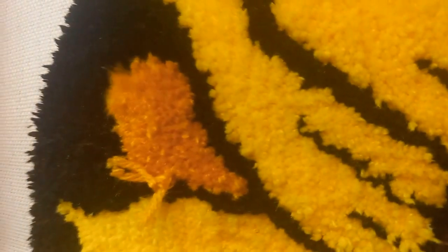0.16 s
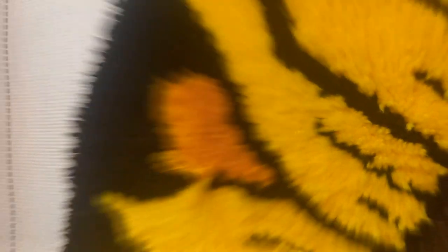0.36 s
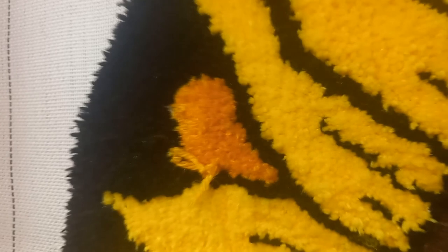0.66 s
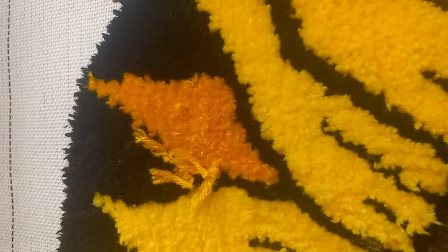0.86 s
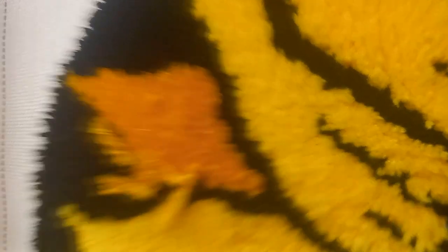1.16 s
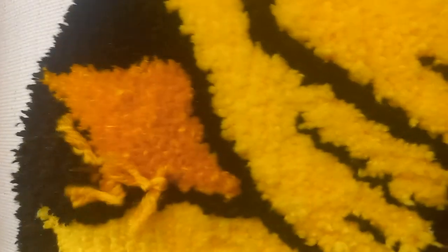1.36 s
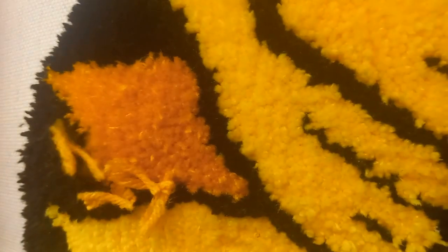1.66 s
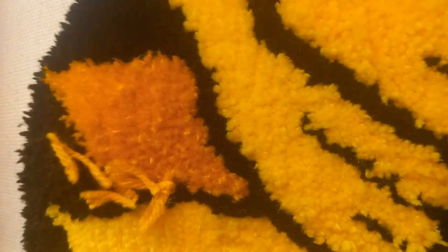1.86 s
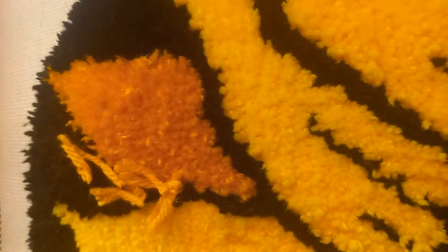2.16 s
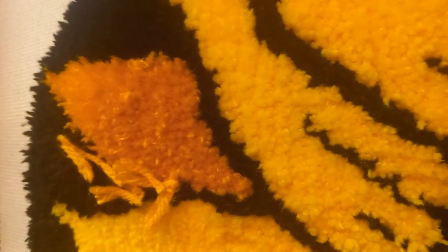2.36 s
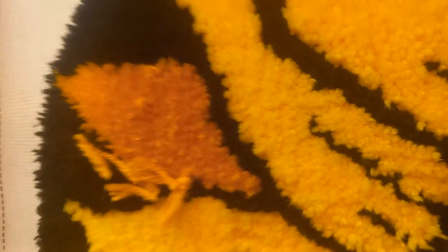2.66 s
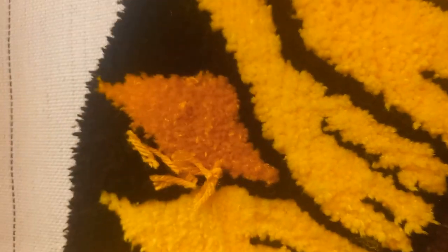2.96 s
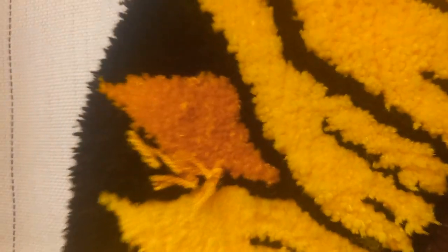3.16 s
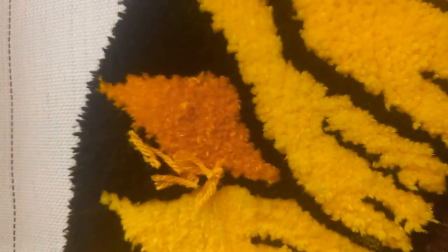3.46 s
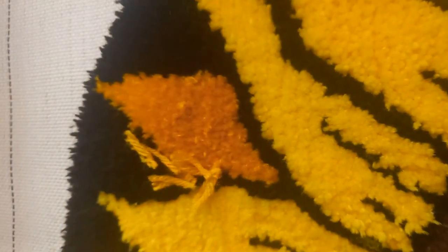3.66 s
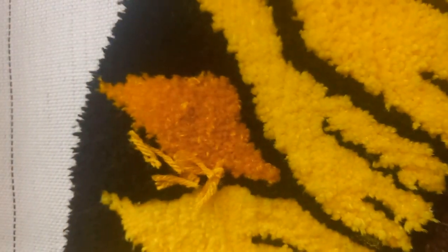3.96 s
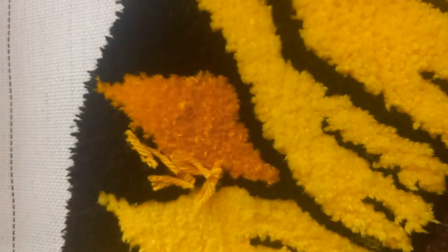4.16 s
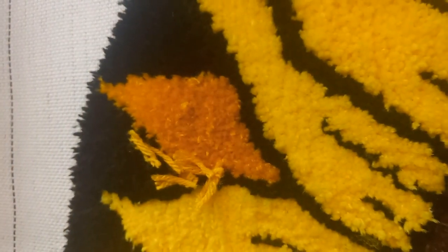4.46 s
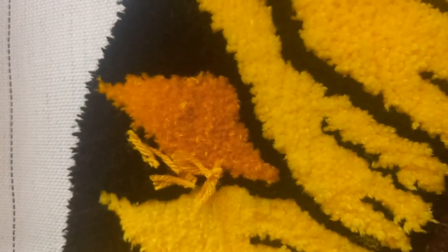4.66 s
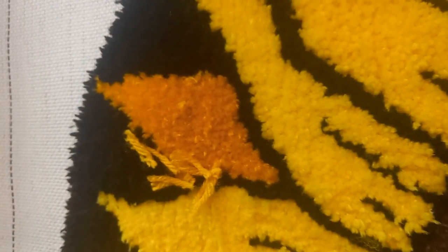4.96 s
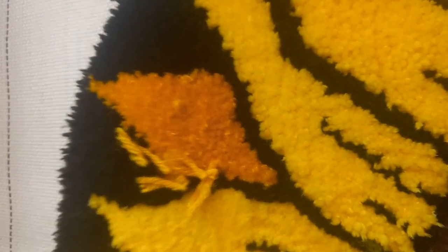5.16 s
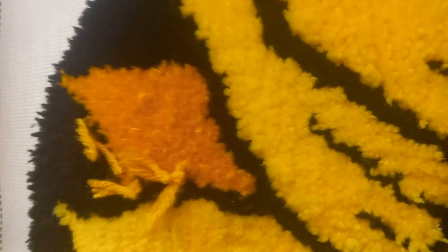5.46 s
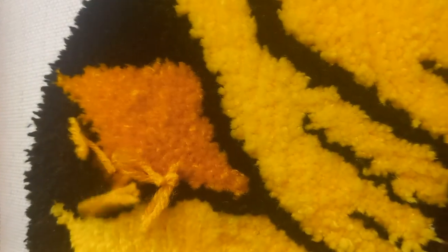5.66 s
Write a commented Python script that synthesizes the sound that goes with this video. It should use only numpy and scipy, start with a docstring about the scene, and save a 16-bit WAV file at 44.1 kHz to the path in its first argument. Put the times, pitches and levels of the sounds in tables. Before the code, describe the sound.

Close by in a small, slightly echoing room, an electric tufting gun punches yarn into stretched cloth. It is already running and stops almost at once. After a pause and a few clicks it runs for about a second and a half, with a fast rattle, crisp snips, low thumps and a wavering gear whine. A longer pause with faint ticks and low background noise follows, then the gun starts again near the end.

```python
"""A small live room: close by, an electric tufting gun punches yarn into stretched cloth in three bursts.
Each stroke snips the yarn, rattles the frame and thumps the cloth; the gears whine, sagging twice a
stroke under load. Between bursts the gun is shifted on the cloth with faint ticks. Underneath lies
low background noise whose level steps or ramps up, holds, then fades down."""
import sys
import numpy as np
from scipy import signal
from scipy.fft import rfft, irfft, next_fast_len
from scipy.io import wavfile
from scipy.ndimage import map_coordinates

SR = 44100
rng = np.random.default_rng(int(sys.argv[2]) if len(sys.argv) > 2 else 0)


def wav_record(signal):
    """Record a signal, one row per channel, as 16-bit PCM in the file named by sys.argv[1]."""
    frames = np.transpose(np.atleast_2d(signal))
    bounded = np.clip(frames, -1, 1)
    # unit amplitude maps onto the largest positive 16-bit level
    quanta = np.round(bounded * 32767).astype(np.int16)
    wavfile.write(sys.argv[1], SR, quanta)


N = 255853


def amp(db):
    """Decibels to gain."""
    return 10 ** (np.asarray(db) / 20)


def unit(x):
    """x at rms 1."""
    return x / np.sqrt(np.mean(x ** 2) + 1e-20)


def along(points, hz):
    """Read a curve of (Hz, value) points on a log frequency axis."""
    f, v = np.transpose(points)
    return np.interp(np.log(hz + 1), np.log(f + 1), v)


def bell(t, centre, width):
    """A bell-shaped envelope that peaks at 1."""
    return np.exp(-((t - centre) / width) ** 2)


def wobble(rate):
    """A smooth random curve, rate knots a second."""
    count = int(N * rate / SR) + 4
    at = np.linspace(0, count - 1, count * 6)
    return np.interp(np.arange(N) * rate / SR, at, map_coordinates(rng.standard_normal(count), [at]))


def filtered(x, response):
    """EQ x with a gain given as a function of frequency."""
    n = x.shape[-1]
    m = next_fast_len(n + 8192)
    return irfft(rfft(x, m) * response(np.fft.rfftfreq(m, 1 / SR)), m)[..., :n]


def resonate(x, modes):
    """x through parallel resonances (centre [Hz], width [Hz], gain [dB])."""
    return filtered(x, lambda f: sum(amp(db) * 1j * f * w / (c * c - f * f + 1j * f * w)
                                     for c, w, db in modes))


def spread(pair, spectrum, alike):
    """Two unrelated signals coloured and blended into stereo of rms 1."""
    angle = lambda hz: np.arccos(np.clip(along(alike, hz), -1, 1)) / 2
    mid, side = filtered(pair, lambda f: amp(along(spectrum, f)) * [np.cos(angle(f)), np.sin(angle(f))])
    return unit(np.array([mid + side, mid - side]))


def add(track, s, sound):
    """Mix a sound into the track at time s."""
    i = round(s * SR)
    a, b = max(i, 0), min(i + sound.shape[-1], N)
    if b > a:
        track[..., a:b] += sound[..., a - i:b - i]


def thud(hz, swell):
    """A soft, heavily damped blow that peaks after swell seconds."""
    t = np.arange(SR // 6) / SR
    return (t / swell * np.exp(1 - t / swell)) ** 2 * np.sin(2 * np.pi * hz * t)


# colour of the low rush (frequency [Hz], relative level [dB])
RUSH_EQ = [(18, -55), (30, -31), (50, -18), (106, -3.5), (190, -9), (283, -4.5), (392, -10), (557, -13.5),
           (704, -23.5), (1050, -27), (1520, -31.5), (5010, -42.5), (8000, -53), (10400, -81),
           (17600, -120)]
# colour of the thin hiss (frequency [Hz], relative level [dB])
HISS_EQ = [(3000, -38.5), (9000, -15), (11000, -3.5), (14000, 1.5), (16000, -1.5)]
# stereo image of the noise bed (frequency [Hz], left-right correlation [-1..1])
BED_IMAGE = [(60, 0.51), (180, 0.95), (550, 0.62), (1650, -0.14), (4970, -0.0), (15000, 0.02)]
# the bed's level steps or ramps up, holds, fades down (start [s], rise [s], end of hold [s], boost [dB])
BED_BOOSTS = [(.848, .01, 1.55, 12), (3.85, 0.52, 5.8, 12)]

def noise_bed(t, rush_floor_db=-56, hiss_floor_db=-78, uneven_db=.8, fade_s=1.7):
    """Background noise: a low, slightly uneven rush and a thin hiss on one shared level envelope."""
    boost_db = sum(db * np.clip((t - start) / rise, 0, 1) * np.clip(1 - (t - end) / fade_s, 0, 1)
                   for start, rise, end, db in BED_BOOSTS)
    rush_gain = amp(rush_floor_db + uneven_db * wobble(16))
    rush = rush_gain * spread(rng.standard_normal((2, N)), RUSH_EQ, BED_IMAGE)
    hiss = amp(hiss_floor_db) * spread(rng.standard_normal((2, N)), HISS_EQ, BED_IMAGE)
    return amp(boost_db) * (rush + hiss)


# reverb decay (frequency [Hz], t60 [s])
ROOM_DECAY = [(100, 0.18), (500, 0.58), (1400, 0.5), (2200, 0.55), (3700, 0.51), (10000, 0.47),
              (16000, .35)]
# EQ on the reverb send (frequency [Hz], gain [dB])
ROOM_SEND = [(80, -8), (300, -12), (700, -5.5), (1100, -9), (1600, -0.5), (2200, -4), (4000, -0.5),
             (14000, -1.5)]

def room(x):
    """The walls answer with a short tail; each frequency dies at its own speed."""
    hz, t, noise = signal.stft(rng.standard_normal((2, int(.7 * SR))), SR, nperseg=256)
    decay = amp(-60 * t / along(ROOM_DECAY, hz)[:, None])
    tail = signal.istft(noise * decay / np.linalg.norm(decay, axis=1, keepdims=True), SR, nperseg=256)[1]
    tail = np.pad(tail / np.linalg.norm(tail[0]), ((0, 0), (SR // 200, 0)))  # 5 ms pre-delay
    send = filtered(x.mean(0), lambda hz: amp(along(ROOM_SEND, hz)))
    return signal.fftconvolve(send[None], tail, axes=1)[:, :N]


def scuff(t, at_s=1.35, width_s=.03, db=-60, hz=5000.5):
    """The gun's steel foot slides over the cloth: a soft, brief brush."""
    brush = unit(resonate(rng.standard_normal((2, N)), [(hz, hz, 0)]))
    return amp(db) * bell(t, at_s, width_s) * brush


# trigger, slack gears and handling (time [s], level before trim [dB], centre [Hz])
CLICKS = [(1.175, -45.5, 4980), (1.339, -22.5, 3540), (1.362, -17, 2100), (1.374, -20, 2000),
          (1.4455, -15, 2800), (2.748, -26, 2384), (4.459, -51, 6000), (4.846, -57, 5970),
          (4.916, -56.5, 7040), (5.08, -54.5, 5460), (5.253, -47, 6500), (5.542, -30.5, 2300),
          (5.561, -23, 3410)]
# the foot bumps the cloth (time [s], pitch [Hz], level [dB], attack [s])
BUMPS = [(.258, 306, -31, 0.0056), (0.291, 91, -32.5, 0.014), (1.149, 153, -43, 0.014),
         (1.176, 77.6, -34, 0.016), (1.343, 170, -25.5, 0.0043), (1.358, 325, -28, .008),
         (1.444, 330, -18, .003), (2.084, 290, -23, 0.0036), (2.135, 300, -23.5, 0.0029),
         (2.274, 92, -25.5, 0.01), (2.379, 115.3, -15, 0.0061), (2.379, 325, -10.5, 0.0015),
         (2.755, 89, -26.5, 0.0089), (5.076, 124, -35, 0.0087), (5.566, 220, -25.5, 0.0027),
         (5.626, 322, -26, 0.007)]
# steel pings as the motor jerks into motion (time [s], pitch [Hz], level [dB], t60 [s])
PINGS = [(5.543, 2430, -46, .08), (5.566, 4572, -28, .2), (5.566, 4568, -37, .9)]

def handling(click_t60=.026, click_trim_db=-3.5):
    """Spot effects: clicks of trigger and slack gears, bumps on the cloth and the ping of steel."""
    out, t = np.zeros((2, N)), np.arange(SR // 2) / SR
    for s, db, hz in CLICKS:
        crack = resonate(rng.standard_normal((2, len(t))), [(hz, .5 * hz, 0)])
        add(out, s, amp(db + click_trim_db - 60 * t / click_t60) * unit(crack))
    for s, hz, db, swell in BUMPS:
        add(out, s, amp(db) * thud(hz, swell))
    for s, hz, db, t60 in PINGS:
        add(out, s, amp(db - 60 * t / t60) * np.sin(2 * np.pi * hz * t))
    return out


# the motor is switched on and off (start [s], end [s], trim [dB])
BURSTS = [(-.4, .325, .5), (1.338, 2.772, 0), (5.569, 5.9, 0.65)]

def drive(t, running_db, surge_db, fade_db_per_s, attack_s=.008, surge_s=.15, release_s=.015):
    """One part's envelope: on with the motor, a surge, then a slow drift until the trigger is let go."""
    gain = np.zeros(len(t))
    for start, end, db in BURSTS:
        age = np.maximum(t - start, 0)
        gate = np.clip(age / attack_s, 0, 1) * np.clip((end - t) / release_s + .5, 0, 1)
        gain += gate * amp(db + running_db + surge_db * np.exp(-age / surge_s) - fade_db_per_s * age)
    return gain


# colour of the sliding parts (frequency [Hz], relative level [dB])
RATTLE_EQ = [(45, -35), (70, -8), (120, -6.5), (200, -11), (380, -20), (580, -20.5), (700, -16),
             (1050, -5.5), (1300, -17.5), (1900, -15), (2600, -17.5), (3700, -18), (6000, -23),
             (8000, -24.5), (9800, -32), (12000, -27), (16000, -34.5)]
# the frame's resonances (centre [Hz], width [Hz], gain [dB])
FRAME_MODES = [(315, 37, 2.5), (441.4, 37, -0.5), (569, 84, -1.5), (760, 32, -2), (1020, 21, 2),
               (1543, 73, -8.5), (2217, 100, 3), (2980, 45, -6.5), (3480, 40, -9), (4586, 30, -7),
               (5650, 200, -10.5)]
# stereo image of the loose parts (frequency [Hz], left-right correlation [-1..1])
PARTS_IMAGE = [(100, 1), (300, 0.97), (640, 0.98), (1400, 0.51), (3100, 0.72), (6000, .2), (15000, 0.4)]

def rattle(ticks_per_s=950, slide=.48, frame_db=-4):
    """Loose links tick against each other over the hiss of the sliding needle bar, and shake the frame."""
    ticks = (rng.random(N) < ticks_per_s / SR) * rng.uniform(-.98, 1, (2, N))
    shake = unit(ticks) + slide * rng.standard_normal((2, N))
    flat_eq = [(100, .0035), (5000, .0037)]
    frame = unit(resonate(spread(shake, flat_eq, PARTS_IMAGE), FRAME_MODES))
    return spread(shake, RATTLE_EQ, PARTS_IMAGE) + amp(frame_db) * frame


# chatter as the motor kicks in (time [s], level [dB], attack [s])
JOLTS = [(1.341, -26, 0.015), (5.565, -26.5, .018)]

def jolts(t):
    """The starting torque throws the slack parts against the frame."""
    kick = sum(amp(db) * np.clip((t - s) / swell, 0, None) * np.exp(1 - np.abs(t - s) / swell)
               for s, db, swell in JOLTS)
    dark_eq = [(300, 9), (600, 9.5), (1100, 7.5), (2200, 4), (4500, -11)]
    chatter = spread(rng.standard_normal((2, N)), dark_eq, PARTS_IMAGE)
    return kick * unit(resonate(chatter, FRAME_MODES))


STROKE_S = .0925  # nominal length of a stroke, one turn of the crank
# runs of even strokes (first snip [s], last snip [s])
RUNS = [(0.075, 0.26), (1.397, 2.139), (2.2385, 2.705), (5.6234, 5.715)]

def stroke_times():
    """The rhythm: times of the snips, and of the crank's turns, one more at both ends of a burst."""
    cuts = np.concatenate([np.linspace(a, b, round((b - a) / STROKE_S) + 1) for a, b in RUNS])
    bursts = np.split(cuts, np.flatnonzero(np.diff(cuts) > 2 * STROKE_S) + 1)
    return cuts, np.concatenate([np.r_[s[0] - STROKE_S, s, s[-1] + STROKE_S] for s in bursts])


# the needle's blows in each stroke (position [turns], pitch [Hz], relative level [dB], attack [s])
NEEDLE_BLOWS = [(0, 321.1, -2.5, 0.014), (.1, 65.8, -2, .015), (.165, 92, 5.6, 0.0073),
                (.24, 259, -6, 0.0045), (.62, 112, -1.5, .007), (.63, 195, -3, 0.0046),
                (.58, 579, -8.5, 0.0081)]
# the taut cloth rings on (centre [Hz], width [Hz], gain [dB])
CLOTH_MODES = [(69, 18, -9), (96, 12, -4), (312, 20, -8)]

def cloth(strokes, scatter_db=1.3, detune=.027):
    """The low end: the needle plunges into the taut cloth and pulls out, one pattern for every stroke."""
    out = np.zeros(N)
    for s in strokes:
        for share, hz, db, swell in NEEDLE_BLOWS:
            louder, sharper = rng.standard_normal(2)
            blow = thud(hz * (1 + detune * sharper), swell)
            add(out, s + share * STROKE_S, amp(db + scatter_db * louder) * blow)
    return out + resonate(out, CLOTH_MODES)


# colour of the blades (frequency [Hz], gain [dB])
SNIP_EQ = [(800, -23), (3000, -2.5), (6000, 3.5), (9500, -3), (12000, 5), (16000, -4.5)]

def snips(times, scatter_db=1, t60=.028):
    """The top end: the scissor blades snap shut with a bright, dry crack, once a stroke."""
    out, t = np.zeros((2, N)), np.arange(SR // 20) / SR
    for s, gain in zip(times, drive(times, running_db=-29.5, surge_db=6, fade_db_per_s=.5)):
        envelope = gain * amp(scatter_db * rng.standard_normal() - 60 * t / t60)
        add(out, s, envelope * rng.standard_normal((2, len(t))))
    return filtered(out, lambda hz: amp(along(SNIP_EQ, hz)))


# needle in and needle out load the gears
# (position [turns], half width [turns], tooth load [dB], swing [share of speed])
PUSHES = [(.32, .125, 12.5, .066), (.84, 0.1162, 13.5, .05)]

def crank(turn, max_drag=.22):
    """Speed and tooth load: the motor runs up before each push, slows through it and drags on the cloth."""
    speed, load_db = 1, 0
    for share, width, db, swing in PUSHES:
        offset = ((turn - share + .5) % 1 - .5) / width
        speed -= swing * offset * np.exp((1 - offset ** 2) / 2)
        load_db += db * np.exp(-np.abs(offset) ** 3 / 2)
    grip = rng.random(int(turn.max()) + 1)[turn.astype(int)]  # the cloth's hold varies by stroke
    drag = max_drag * grip * bell(turn % 1, centre=.56, width=.12)
    return speed * (1 - drag), load_db


# gear tone, even harmonics strongest (harmonic [x tooth rate], relative level [dB])
GEAR_HARMONICS = [(1, -7.5), (2, 3), (3, -8.5), (4, 0), (5, -13.5), (6, -6.5), (7, -14.5), (8, -8.5),
                  (10, -20)]
# the housing's resonances (centre [Hz], width [Hz], gain [dB])
HOUSING_MODES = [(1020, 370, -9), (1588, 200, -3), (2202, 150, 7), (3550, 250, -2.5), (5760, 440, -8)]

def gears(tooth_hz, load_db, open_db=-5):
    """Meshing teeth sing, partly in the open; harmonic four sweeps through the housing's main resonance."""
    unsteady = 1 + .009 * wobble(35) + .007 * wobble(700)
    phase = 2 * np.pi * np.cumsum(tooth_hz * unsteady) / SR
    tone = amp(load_db) * sum(amp(db + 2.2 * wobble(200)) * np.sin(k * phase) for k, db in GEAR_HARMONICS)
    return unit(amp(open_db) * tone + resonate(tone, HOUSING_MODES))


# the motor labours or runs down (time [s], half width [s], loss [share of speed])
SAGS = [(.312, .016, .27), (1.548, .012, .14), (2.305, .02, .24), (2.775, .012, .25)]

def gun(t, tooth_hz=554.7, load_to_rattle=.1):
    """The main source: the crank drives gears, rattle, needle and scissors while the motor is on."""
    cuts, strokes = stroke_times()
    speed, load_db = crank(np.interp(t, strokes, np.arange(len(strokes))))
    sag = sum(loss * bell(t, s, width) for s, width, loss in SAGS)
    whine_gain = drive(t, running_db=-33, surge_db=2.8, fade_db_per_s=-.3, attack_s=.07)
    whine = whine_gain * gears(tooth_hz * speed * (1 - sag), load_db)
    pulse = amp(load_to_rattle * (load_db - load_db.mean()))
    clatter = drive(t, running_db=-34.5, surge_db=4.1, fade_db_per_s=1.7) * pulse * rattle()
    thumps = drive(t, running_db=-31.5, surge_db=0, fade_db_per_s=2.3) * cloth(strokes)
    return whine + clatter + thumps + snips(cuts) + jolts(t)


# the gun's pan (frequency [Hz], left minus right [dB])
GUN_PAN = [(100, 3), (200, -1), (380, -4.5), (700, -1), (1300, 0.5), (2300, 2.5), (4400, 0), (8100, 16.5),
           (15000, 5)]
# phase between the channels (frequency [Hz], left lead [rad])
GUN_PHASE = [(280, 0.26), (550, 1.51), (1050, 1.79), (1600, 0.15), (2200, 0.045), (3600, 1.3), (6000, 1.2)]

def placement(hz):
    """The gun sits a little to the left, its treble most of all, and reaches the two sides out of step."""
    gain = amp(np.outer([.5, -.5], along(GUN_PAN, hz)))
    lead = np.outer([.5, -.5], along(GUN_PHASE, hz))
    return gain / np.sqrt(np.mean(gain ** 2, axis=0)) * np.exp(1j * lead)


# the gun and its reverb dip briefly (time [s], half width [s], depth [dB])
DIPS = [(0.124, 0.02, 4.5), (1.45, 0.012, 14), (1.473, 0.011, 7), (2.151, 0.02, 7.5), (2.32, .009, 8.5),
        (2.377, .035, 5)]

def scene():
    """The mix: the gun and its room reverb over the noise bed."""
    t = np.arange(N) / SR
    direct = gun(t) + handling() + scuff(t)
    dip_db = sum(depth * bell(t, s, width) for s, width, depth in DIPS)
    return amp(-dip_db) * filtered(direct + room(direct), placement) + noise_bed(t)


def record(dry, low_cut_hz=50, top_hz=16250):
    """Master EQ: roll off the deep bass and cut everything above the band limit."""
    return filtered(dry, lambda hz: (hz < top_hz) * hz ** 3 / np.hypot(hz ** 3, low_cut_hz ** 3))


dry = scene()
out = record(dry)
wav_record(out)
```